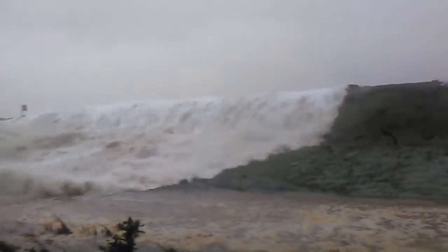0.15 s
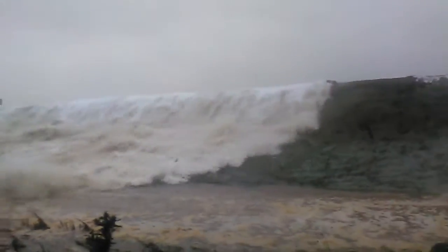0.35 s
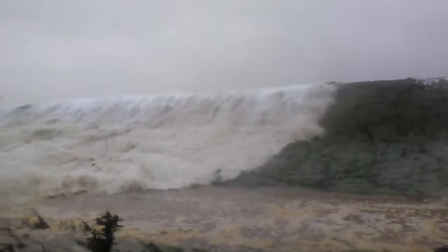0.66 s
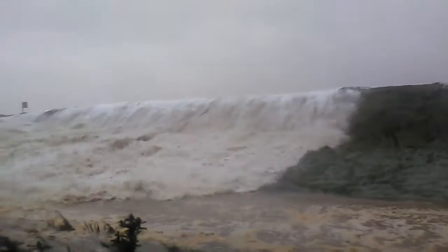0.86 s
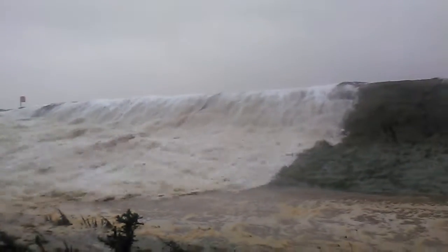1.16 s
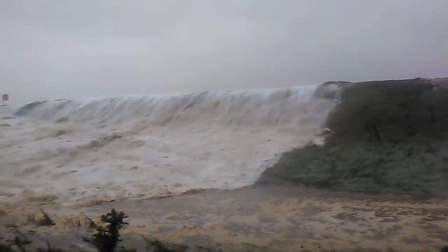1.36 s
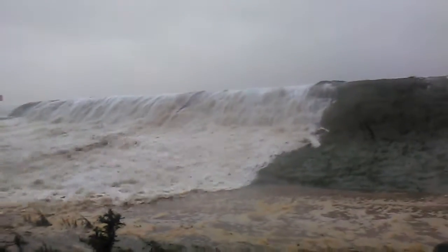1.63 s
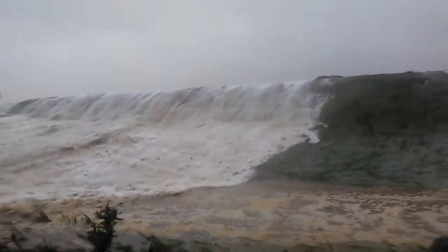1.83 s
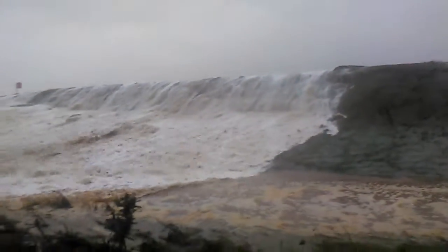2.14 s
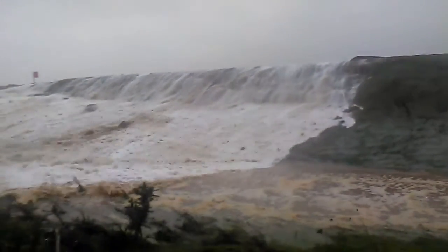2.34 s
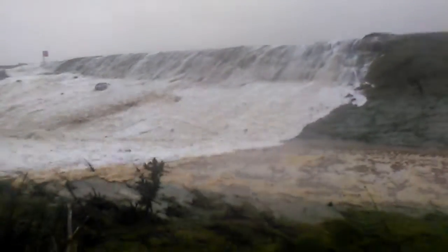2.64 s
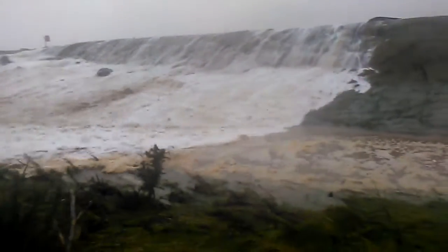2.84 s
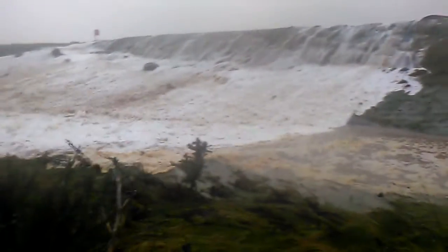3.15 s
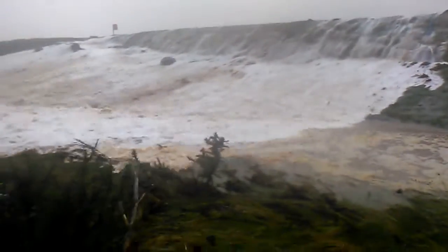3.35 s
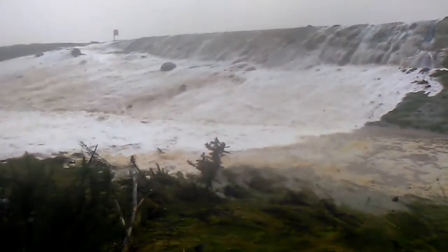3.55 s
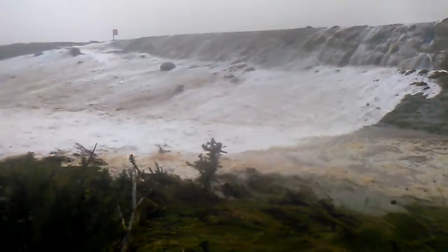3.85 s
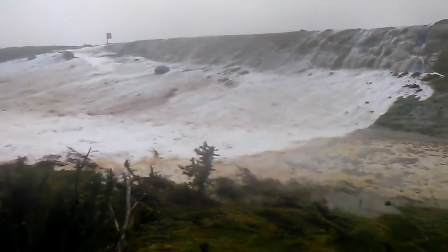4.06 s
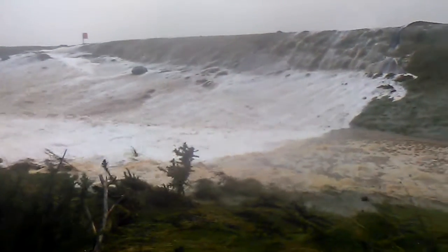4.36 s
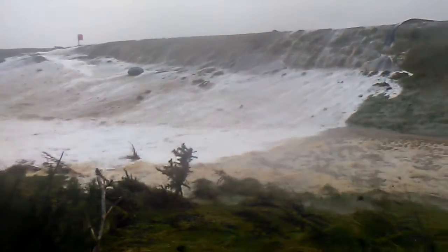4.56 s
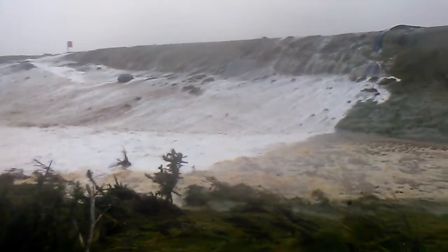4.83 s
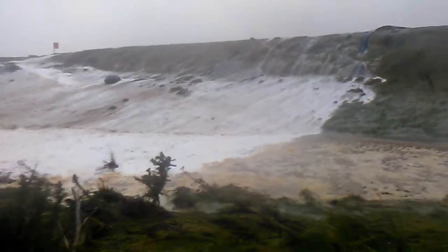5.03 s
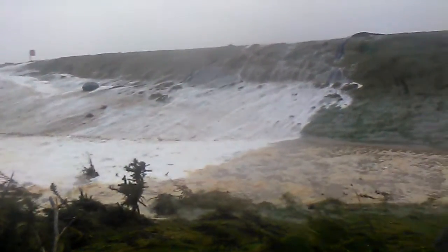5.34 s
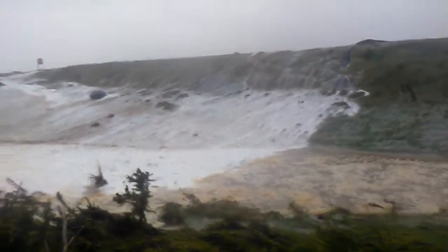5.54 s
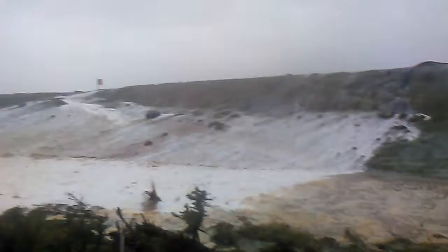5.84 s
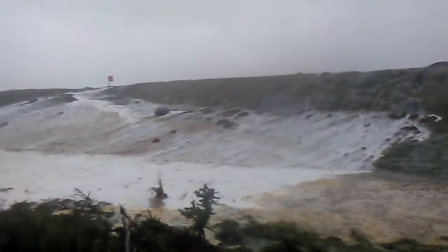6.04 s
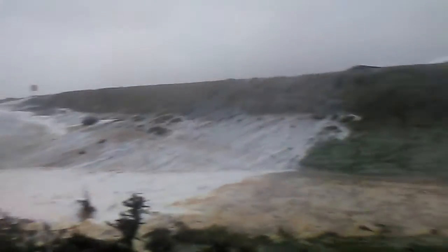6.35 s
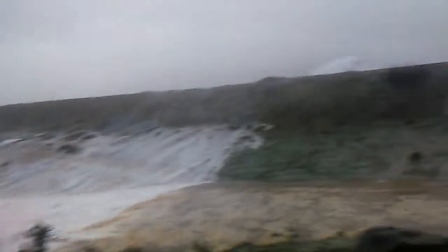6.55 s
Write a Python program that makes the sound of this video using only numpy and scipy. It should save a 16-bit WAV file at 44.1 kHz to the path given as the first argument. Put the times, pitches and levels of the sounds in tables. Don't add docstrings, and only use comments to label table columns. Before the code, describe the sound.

Gale wind strikes a small microphone directly, close, dry and distorted, while a broken wave drains down a sea wall beyond. From 0 s, low fluttering buffets thump continuously, with tearing mid-range noise, a faint breathy whistle that soon fades, and fine spray ticks; strong puffs hit at about 0.15 and 0.43 s. Between 1 and 2.8 s it is somewhat steadier, with fewer puffs and a distant wash of foam fluttering under the wind. Around 3.15 s deep blows land and the sound roughens, crackling and choking in tiny gaps that leave a brief bass ring. Another low thump comes at 4.15 s, then dense puffs and spray around 4.5 to 5 s. Near 5.9 s the sound stalls and a hard hollow knock lands. From 6.1 s gusts crowd together, louder and brighter, still rising at the cut-off, about 6.7 s.

```python
import sys
import numpy as np
from scipy import signal
from scipy.fft import rfft, irfft, next_fast_len
from scipy.io import wavfile
from scipy.ndimage import uniform_filter1d, minimum_filter1d, map_coordinates

SR = 44100
rng = np.random.default_rng(int(sys.argv[2]) if len(sys.argv) > 2 else 0)


def undo_db(level):
    steps = np.asarray(level, float) / 20
    return 10 ** steps


def transcribe(signal):
    frames = np.atleast_2d(signal).T
    limited = np.clip(frames, -1, 1)
    pcm = np.round(limited * 32767).astype(np.int16)
    wavfile.write(sys.argv[1], SR, pcm)


N = 295161

# (time [s], peak [dB], pitch of the thud [Hz])
PUFFS = [(0.147, -13, 627), (0.22, -20, 511), (0.43, -10, 750), (0.807, -19, 720), (0.906, -20, 546),
         (1.436, -22.5, 468), (1.554, -21.5, 740), (1.575, -17, 500), (2.359, -29, 517), (2.437, -27, 617),
         (2.514, -20, 547), (2.881, -21, 482), (3.005, -21.5, 587), (3.294, -20.5, 620), (3.326, -22, 650),
         (3.394, -27, 474), (3.719, -24, 533), (3.803, -23, 474), (4.139, -18, 452), (4.565, -24, 447),
         (4.587, -16.5, 624), (4.681, -18, 856), (4.723, -18, 660), (4.881, -21, 470), (5.443, -17, 655),
         (5.472, -18, 467), (5.627, -23, 545), (5.768, -16.5, 520), (5.964, -27, 510), (6.166, -18, 703),
         (6.185, -20, 511), (6.3, -19, 447), (6.333, -13, 640), (6.361, -22, 452), (6.482, -20.5, 815),
         (6.535, -13, 574), (6.616, -15.5, 470)]


def unit(x):
    return x / np.sqrt(np.mean(x ** 2) + 1e-20)


def curve(rows):
    time, value = np.transpose(rows)
    return np.interp(np.arange(N) / SR, time, value)


def wobble(rate_hz):
    knots = rng.standard_normal(int(N * rate_hz / SR) + 4)
    return map_coordinates(knots, [np.arange(N) * rate_hz / SR])


def filtered(x, response):
    size = next_fast_len(N + SR // 2)
    return irfft(rfft(x, size) * response(np.fft.rfftfreq(size, 1 / SR)), size)[..., :N]


def resonance(f, hz, width_hz):
    return 1j * f * width_hz / (hz * hz - f * f + 1j * f * width_hz)


def rush(spectrum, patchy_db, lumps_db):
    z = signal.stft(rng.standard_normal(N), nperseg=512)[2]
    patches = uniform_filter1d(rng.standard_normal(z.shape), size=7, axis=0)
    patches = uniform_filter1d(patches, size=6, axis=1)
    noise = signal.istft(z * undo_db(patchy_db * unit(patches)), nperseg=512)[1][:N]
    f, db = np.transpose(spectrum)
    coloured = filtered(noise, lambda hz: undo_db(np.interp(np.log(hz + 1), np.log(f), db)))
    return unit(undo_db(lumps_db) * coloured)


def humps(rows):
    spread = 0.34
    t = np.arange(0, N, 64) / SR
    bells = sum(db * np.exp(-((t - s) * 1000 / (spread * ms)) ** 2) for s, db, ms in rows)
    return np.interp(np.arange(N) / SR, t, bells)


def layer_gain(base_db, per_gale, per_gust, extra_db=0):
    # (time [s], level [dB])
    strength = [(0, -6), (.45, 1.5), (1.2, -2), (1.9, 0), (3.2, -3), (4.1, 0.5), (4.85, 0), (5.35, 0.5),
                (6, 1), (6.69, 7.5)]
    # (centre [s], lift [dB], length [ms])
    gusts = [(0.299, -4.5, 12), (0.43, 2.5, 37), (0.575, 3.5, 68), (0.703, 0.5, 76), (0.924, 3, 58),
             (1.117, 3, 42), (1.437, 2.5, 35), (1.571, 1, 20), (1.826, 2.5, 69), (2.01, 3, 140),
             (2.524, 0.5, 47), (2.839, 1.5, 660), (3.158, 2.5, 55), (3.341, 2.5, 85), (3.651, 2.5, 66),
             (3.766, 6.5, 27), (3.966, -1.5, 64), (4.046, 2.5, 42), (4.142, 4.5, 60), (4.576, 4, 83),
             (4.684, 2, 50), (5.038, 3.5, 700), (5.293, 3, 44), (5.566, 4, 81), (5.713, 1, 170),
             (5.976, 4.5, 21), (6.047, 2, 190), (6.245, 2, 49), (6.376, 2.5, 33), (6.555, 3, 24)]
    # (centre [s], lift [dB], length [ms])
    lulls = [(0.09, -8, 72), (0.499, -6, 33), (0.849, -6, 36), (1.741, -2.5, 66), (1.901, -3, 54),
             (2.11, -3, 77), (3.063, -5, 81), (3.203, -4.5, 26), (3.697, -4, 53), (4.225, -4.5, 25),
             (4.381, -5.5, 71), (4.467, -6, 46), (4.819, -2.5, 110), (5.18, -4.5, 325), (5.25, -2, 37),
             (5.359, -4.5, 160), (5.617, -2.5, 230), (5.91, -2.5, 65), (6.131, -4, 19), (6.509, -2, 180)]
    gust_db = 1.31 * humps([*gusts, *lulls])
    return undo_db(base_db + per_gale * curve(strength) + per_gust * gust_db + extra_db)


def turbulence():
    swirl = unit(0.38 * wobble(21) + 0.23 * wobble(28) + 0.93 * wobble(60) + 1.1 * wobble(170))
    return unit(np.tanh(2.0 * swirl))


def gale(eddies):
    # (frequency [Hz], level [dB per Hz])
    buffet_spectrum = [(8, 3.5), (30, -15.5), (60, -1), (110, -1.5), (160, -2.5), (250, -11.5), (400, -21),
                       (800, -45), (1600, -99)]
    tearing_spectrum = [(100, -46.5), (200, -0.5), (320, -0.5), (500, -5), (750, -8), (1100, -17),
                        (1700, -29), (3000, -45.5), (6000, -86.5)]
    rasp_spectrum = [(3000, -29.5), (5000, -4), (6500, -2.5), (8000, -6.5), (10000, -13.5), (12000, -17.5),
                     (14500, -23.5), (20000, -30.5)]
    # (centre [s], lift [dB], length [ms])
    rollers = [(0.085, -2.5, 31), (0.464, 5.5, 69), (0.594, 0, 73), (0.823, -2.5, 41), (1.252, -5.5, 40),
               (1.382, -7, 58), (1.581, -2, 100), (2.185, 2.5, 33), (2.649, -3.5, 210), (3.088, -2, 20),
               (3.168, 1.5, 92), (3.263, 3.5, 38), (3.306, -10, 23), (3.485, -5.5, 20), (6.174, -8, 18),
               (6.313, -4, 25), (6.604, -6, 22), (5.939, -8, 20), (0.03, 4, 51), (3.771, 0.5, 76),
               (4.001, -2, 140), (4.101, -7, 28), (4.171, 2.5, 90), (4.375, -1, 96), (4.49, -4.5, 88),
               (4.624, 4, 110), (4.814, -3.5, 79), (4.989, -1, 34), (5.343, -1, 91), (5.617, -1, 190),
               (5.767, -2.5, 50), (5.907, -13, 65), (5.996, 2.5, 160), (6.4, 1.5, 47), (6.57, 2, 14)]
    # (centre [s], lift [dB], length [ms])
    sheets = [(0.44, 2, 54), (0.72, 6, 150), (1.11, 3, 30), (3.76, 3.5, 40), (4.05, 3.5, 30),
              (4.142, 6.5, 45), (4.265, 8, 27), (4.67, 3.5, 30), (4.985, 7, 35), (5.05, 2.5, 27),
              (5.988, 9.5, 14), (6.0, 2.5, 66), (6.4, 3, 80)]
    roll_db = humps(rollers)
    buffet_lumps = 1.38 * eddies + 0.29 * wobble(18)
    tearing_lumps = 1.37 * eddies + 1.52 * wobble(70) + 0.21 * wobble(11)
    rasp_lumps = 1.2 * eddies + 1.4 * wobble(140) + 1.1 * wobble(8.5)
    buffet = layer_gain(-18.5, 0.03, 0.064, 1.15 * roll_db) * rush(buffet_spectrum, 0.14, buffet_lumps)
    tearing = layer_gain(-28.5, 0.7, 0.92, 0.2 * roll_db) * rush(tearing_spectrum, 0.5, tearing_lumps)
    rasp = layer_gain(-66, 1, 0.79, humps(sheets)) * rush(rasp_spectrum, 1.5, rasp_lumps)
    return buffet + tearing + rasp


def slaps():
    # (time [s], peak [dB], pitch [Hz])
    thumps = [
        (3.142, -10, 147),
        (3.158, -8, 141.6),
        (3.172, -10, 129.3),
        (4.147, -9.5, 202),
        (4.165, -10.5, 190),
        (5.9373, -15, 330),
        (5.94, -27, 1380),
        (2.499, -16.5, 390),
        (2.60, -19.5, 405),
    ]
    puff_hz, puff_decay_s, puff_db = 440, 0.0035, -11.5
    thud_cycles, thud_db = 2.8, -3
    gate, thuds, t = np.zeros(N + SR), np.zeros(N + SR), np.arange(SR // 25) / SR
    for s, db, hz in [*PUFFS, *thumps]:
        span = slice(round(s * SR), round(s * SR) + len(t))
        gate[span] += undo_db(db + puff_db) * min(hz / puff_hz, 1) * np.exp(-t / puff_decay_s)
        ring = np.sin(2 * np.pi * hz * t) * np.exp(-t * hz / thud_cycles)
        thuds[span] += undo_db(db + thud_db) * ring * (1 - np.exp(-t / 0.00097))

    def casing(f):
        body = resonance(f, puff_hz, 510) + undo_db(-16) * resonance(f, 1390, 400)
        return body / (1 + 1j * f / 4200) ** 3

    noise = rng.standard_normal(N)
    return filtered(gate[:N] * noise, casing) / np.std(filtered(noise, casing)) + thuds[:N]


def hush():
    lead_s, depth_db = .007, -4
    sag = np.zeros(N)
    for s, _, _ in PUFFS:
        sag[round((s - lead_s) * SR):round(s * SR)] = depth_db
    return undo_db(uniform_filter1d(sag, size=40))


def spray():
    # (time [s],
    # peak [dB], pitch [Hz])
    splat_hits = [(0.2981, -21, 3820), (1.229, -24, 4340), (1.3474, -23.5, 3750), (2.148, -26, 3860),
                  (2.521, -19.5, 4490), (2.557, -24.5, 5900), (2.836, -21, 4670), (3.2968, -31.5, 3640),
                  (3.2985, -27, 5330), (3.3046, -25, 3550), (3.9608, -20.5, 3960), (4.1285, -27, 3720),
                  (4.5118, -20, 3700), (4.5203, -22, 3900), (4.558, -19, 6300), (4.7846, -22, 3770),
                  (4.8726, -29, 4270), (5.037, -22, 4310), (5.7895, -26.5, 3100), (5.938, -28.5, 3300),
                  (5.9400, -26, 4920), (6.251, -40, 3620), (6.301, -22, 3520), (6.327, -40, 3260),
                  (6.5505, -24, 3260), (6.5914, -30, 3340)]
    # (time [s], peak [dB])
    mist_hits = [(0.0288, -58.5), (0.2967, -60), (0.5038, -57), (0.6165, -54), (0.7637, -56.5),
                 (0.8517, -57.5), (1.1009, -60), (1.5085, -58.5), (1.6352, -60), (1.9335, -59.5),
                 (2.1475, -59), (2.2847, -62.5), (2.5222, -54), (2.5993, -61), (2.651, -62), (3.142, -60.5),
                 (3.2036, -65), (3.2934, -61), (3.4386, -53), (3.47, -64), (3.5625, -60), (3.722, -61.5),
                 (3.7564, -57), (3.8197, -61.5), (4.039, -59), (4.1365, -58.5), (4.136, -61), (4.2552, -60),
                 (4.3884, -63), (4.462, -56.5), (4.4905, -61), (4.5575, -55), (4.6314, -57), (4.7166, -59),
                 (4.785, -61.5), (4.8705, -58.5), (4.9227, -57), (4.9514, -56.5), (5.0372, -55.5),
                 (5.1426, -53), (5.255, -64), (5.2706, -58), (5.534, -60.5), (5.5902, -56.5), (5.7666, -57),
                 (5.9249, -58), (5.9369, -57), (5.9648, -56), (5.9853, -53), (6.0432, -63), (6.1499, -56),
                 (6.1998, -54.5), (6.2332, -55), (6.3006, -61), (6.335, -64.5), (6.3677, -67),
                 (6.3679, -56), (6.6333, -51.5)]
    drops, mist, t = np.zeros(N + SR), np.zeros(N + SR), np.arange(SR // 40) / SR
    for s, db, hz in splat_hits:
        ring = np.sin(2 * np.pi * hz * t) * np.exp(-t / .002)
        splat = rng.standard_normal(len(t)) * np.exp(-t / .0022)
        onset = 1 - np.exp(-t / .0005)
        drops[round(s * SR):][:len(t)] += undo_db(db + 2.5) * (.55 * ring + 1.4 * splat) * onset
    for s, db in mist_hits:
        tick = rng.standard_normal(len(t)) * np.exp(-t / 0.0005)
        mist[round(s * SR):][:len(t)] += undo_db(db + 12.0) * tick
    dull = filtered(drops[:N], lambda f: 1.25 * resonance(f, 4100, 4600) ** 2 / (1 + 1j * f / 5500) ** 4)
    return dull + filtered(mist[:N], lambda f: resonance(f, 10500, 11000) ** 2)


def sea(eddies):
    # (frequency [Hz], level [dB per Hz])
    roar_spectrum = [(700, -37), (1100, 3), (1400, 2.5), (1750, -1), (2100, -2), (2600, -8.5),
                     (3500, -43.5)]
    hiss_spectrum = [(1500, -28), (2300, 0), (3000, 1), (3800, -1.5), (4500, -1.5), (5300, -9), (6500, -16),
                     (8500, -38.5)]
    roar_lumps = 3.5 * eddies + 0.66 * wobble(90) + 0.41 * wobble(14)
    hiss_lumps = 0.77 * eddies + 1.92 * wobble(110) + 0.33 * wobble(28)
    roar = layer_gain(-47.5, 1.87, 0.97) * rush(roar_spectrum, -0.1, roar_lumps)
    hiss = layer_gain(-48, 1.2, 1.08) * rush(hiss_spectrum, 2.0, hiss_lumps)
    return roar + hiss


def whistle():
    # (time [s], level [dB])
    blowing = [(0, -36.5), (.1, -42), (.44, -39), (.47, -44.5), (1.6, -49.5), (3, -52), (6.69, -55)]
    # (frequency [Hz], width [Hz], level [dB])
    slot = [(1654, 720, -1), (3620, 1100, -10)]
    breathy = filtered(rng.standard_normal(N),
                       lambda f: sum(undo_db(db) * resonance(f, hz, width) ** 2 for hz, width, db in slot))
    return undo_db(curve(blowing) + 1.5 * wobble(30)) * unit(breathy)


def scene():
    eddies = turbulence()
    flow = gale(eddies) + sea(eddies) + whistle()
    return (hush() * flow + spray() + slaps())[None]


def grazes():
    # (time [s], length [ms])
    touches = [(0.0177, 1.9), (0.4032, 2.9), (0.4226, 2.2), (0.493, 3.6), (0.5036, 2.5), (0.6579, 2.2),
               (0.7322, 1.7), (0.8208, 2.6), (0.9435, 2.3), (1.0974, 1.8), (1.1237, 1.8), (1.1482, 2.1),
               (1.5037, 2.7), (1.5429, 2.2), (1.6254, 2.3), (1.6481, 2.1), (1.7406, 2.4), (1.7661, 2.3),
               (1.8872, 2.7), (2.0906, 2.0), (2.4439, 2.0), (2.896, 2.2), (2.9128, 2.1), (3.5598, 3.3),
               (3.7969, 2.5), (3.8675, 2.2), (3.8838, 2.0), (3.9319, 2.9), (4.0645, 1.9), (4.3114, 2.6),
               (4.3267, 2.8), (4.489, 2.5), (4.5346, 3.7), (4.5771, 3.1), (4.6194, 3.4), (4.6339, 2.5),
               (4.8059, 2.3), (4.8605, 1.7), (4.9139, 3.4), (4.9943, 2.7), (5.0174, 2.7), (5.0279, 2.3),
               (5.0428, 1.9), (5.1331, 2.0), (5.1806, 2.6), (5.4561, 2.5), (5.5435, 2.0), (5.5808, 1.8),
               (5.6361, 2.1), (5.9977, 2.9), (6.0029, 2.3), (6.1462, 2.7), (6.2355, 2.9), (6.3983, 1.7),
               (6.4414, 2.4), (6.5021, 3.3), (6.524, 2.5), (6.5638, 3.0), (6.5816, 2.5), (6.6043, 2.6)]
    linger_ms, flicks_from_s, flicks_per_s = .5, 3.1, 36
    listed = np.c_[np.add(touches, [0, linger_ms]), -25 + 9 * rng.random(len(touches))]
    rough_s = N / SR - flicks_from_s
    when, length, blow = rng.random((int(flicks_per_s * rough_s), 3)).T
    flicks = np.c_[flicks_from_s + when * rough_s, 1.3 + .9 * length, -30 + 8 * blow]
    return np.r_[listed, flicks]


def pinned(pressure, push_db, snap_s, crackle, crackle_s):
    # (time [s], length [ms], landing blow [dB])
    stalls = [(0.1646, 5.8, -19), (0.7977, 7.6, -14), (0.8333, 4.8, -16), (0.8409, 2.6, -20),
              (0.8452, 3.2, -20), (1.1544, 6.5, -23), (2.1094, 5.5, -18), (2.6935, 3.2, -20),
              (3.1918, 15.6, -17), (3.2645, 2.6, -20), (3.2708, 3.0, -20), (3.2783, 15.8, -13),
              (3.3103, 9.2, -20), (3.3801, 7.6, -19), (3.4534, 6.9, -15), (3.4889, 6.1, -15),
              (3.7133, 5.5, -17), (3.8108, 9.1, -13), (4.2782, 5.2, -12), (4.3664, 20.8, -12),
              (4.3943, 5.9, -24), (4.4461, 15.0, -19), (4.487, 4.1, -19), (4.5447, 3.2, -20),
              (4.7129, 3.9, -19), (5.0119, 3.8, -19), (5.2431, 9.0, -16), (5.6059, 12.0, -12),
              (5.7761, 11.2, -13), (5.8999, 26.3, -20), (5.927, 10.9, -35), (5.9420, 20.8, -5),
              (6.1778, 5.9, -21), (6.1936, 7.8, -11), (6.2231, 6.3, -19), (6.2876, 8.3, -22),
              (6.3188, 7.8, -32), (6.3297, 2.6, -18), (6.3465, 12.3, -13), (6.4676, 4.9, -19),
              (6.6088, 7.0, -24)]
    # (time [s], length [ms])
    bumps = [(0.4426, 4.5), (0.4753, 4.0), (0.5446, 4.6), (0.6657, 2.7), (1.4982, 5.2), (1.5823, 6.4),
             (1.6275, 4.6), (1.7466, 2.7), (1.9007, 2.9), (2.4987, 2.5), (2.9301, 2.1), (3.1837, 3.4),
             (3.3391, 3.0), (3.4017, 3.8), (3.4436, 3.1), (3.554, 4.0), (3.8446, 4.3), (3.8581, 2.1),
             (3.92, 3.1), (4.0719, 2.8), (4.1584, 4.9), (4.2096, 4.0), (4.3067, 3.3), (4.3318, 2.7),
             (4.4981, 5.3), (4.6482, 6.0), (4.7901, 2.8), (4.7964, 2.7), (4.8206, 3.0), (4.8631, 3.9),
             (4.8743, 3.7), (4.8868, 2.1), (4.9531, 2.7), (4.955, 5.8), (4.9792, 4.3), (4.9999, 3.1),
             (5.0052, 3.3), (5.0785, 4.1), (5.1247, 3.0), (5.1296, 3.5), (5.3544, 3.6), (5.3798, 5.4),
             (5.4136, 4.7), (5.5294, 3.1), (5.8107, 3.9), (5.8488, 3.3), (5.8721, 4.5), (5.9839, 3.4),
             (6.0559, 3.7), (6.1251, 2.2), (6.1362, 3.1), (6.1557, 3.1), (6.3108, 7.0), (6.3647, 3.8),
             (6.3901, 2.6), (6.4025, 3.3), (6.4144, 4.5), (6.4738, 3.8), (6.5096, 5.0), (6.5292, 5.4)]
    outer_stop = [2.6935, 3.1918, 3.8108, 4.2782, 4.4461, 4.5447, 5.942, 6.3297]
    bump_blow_db = -23
    rests = np.r_[stalls, np.c_[bumps, np.full(len(bumps), bump_blow_db)], grazes()]
    free, landings, releases, long_rests = np.ones(N + SR), *np.zeros((3, N + SR))
    for (s, ms, blow_db), size in zip(rests, rng.standard_normal(len(rests))):
        side = 1 if s in outer_stop else -1
        hit, release = round((s + .0003) * SR), round((s + ms / 1000 - .0002) * SR)
        free[hit:release] = 0
        landings[hit] = side * undo_db(blow_db + push_db)
        releases[release] = side * undo_db(-25.0 + 1.1 * size) * min(ms / 6, 1) ** .5
        long_rests[release] = min(ms / 12, 1)
    t = np.arange(SR // 25) / SR
    lobe = np.exp(-t / snap_s) / (snap_s * SR)
    landing = np.convolve(landings[::-1], lobe)[:N + SR][::-1]
    leaving = np.convolve(releases, lobe)
    rougher = 1 + crackle * np.convolve(long_rests, np.exp(-t / crackle_s))[:N]
    speed = rougher * np.diff(pressure, prepend=pressure[:, :1])
    return (speed + landing[:N] - leaving[:N]) * free[:N]


def electronics(f):
    # (frequency [Hz], width [Hz])
    seam = [(4040, 110), (4000, 450)]
    position = 1 / (1 - np.exp(-2j * np.pi * f / SR) + 1e-9)

    def high_pass(hz, width_hz):
        return resonance(f, hz, width_hz) * 1j * f / width_hz

    bass_cut = high_pass(52, 21) * high_pass(38, 45) * high_pass(45, 70.2)
    all_pass = np.prod([1 - 2 * resonance(f, hz, width) for hz, width in seam], axis=0)
    return position * bass_cut * all_pass / (1 + 1j * f / 9500)


def whine():
    # (time [s], peak [dB])
    bursts = [(0.0293, -72), (0.1895, -73), (0.3805, -72), (0.9946, -79), (1.1189, -72), (1.1648, -71),
              (1.2052, -76), (1.4456, -76), (1.4794, -79), (1.6357, -72), (1.6721, -76), (1.7195, -69),
              (1.7419, -74), (2.0288, -76), (2.0926, -72), (2.1784, -75), (2.2263, -73), (2.2827, -78),
              (2.3256, -73), (2.4054, -74), (2.4488, -75), (2.5301, -74), (2.5636, -75), (2.602, -73),
              (2.6534, -69), (2.7344, -83), (2.834, -77), (2.8823, -73), (2.9094, -82), (3.0144, -76),
              (3.0434, -81), (3.2041, -75), (3.3443, -79), (3.4101, -75), (3.4474, -74), (3.5728, -73),
              (3.6701, -75), (4.0751, -71), (5.2135, -76), (5.4495, -80), (5.7129, -73), (5.9369, -73)]
    burst_s, under_peak_db, hum_hz, hum_db = .016, -8.5, 10143, -95
    gate = np.zeros(N)
    for s, db in bursts:
        gate[round((s - .003) * SR):][:round(burst_s * SR)] = undo_db(db + under_peak_db)
    narrow = filtered(rng.standard_normal(N), lambda f: resonance(f, 12060, 230) ** 2)
    hum = filtered(rng.standard_normal(N), lambda f: resonance(f, hum_hz, 30) ** 2)
    return uniform_filter1d(gate, size=150) * unit(narrow) + undo_db(hum_db) * unit(hum)


def limited(x, top_db):
    needed = 1 / np.maximum(np.abs(x) / undo_db(top_db), 1)
    return x * uniform_filter1d(minimum_filter1d(needed, size=700), size=600)


def top_cut(x):
    return signal.sosfilt(signal.butter(12, 14330, fs=SR, output="sos"), x)


def record(dry):
    speed = pinned(dry, push_db=0.5, snap_s=0.001, crackle=0.35, crackle_s=0.0093)
    wired = filtered(speed, electronics)
    wired = wired + undo_db(-100) * rng.standard_normal(dry.shape) + whine()
    wired = wired * np.minimum(np.arange(N)[::-1] / 90, 1)
    return top_cut(limited(wired, top_db=-5.3))


dry = scene()
out = record(dry)
transcribe(out)
```